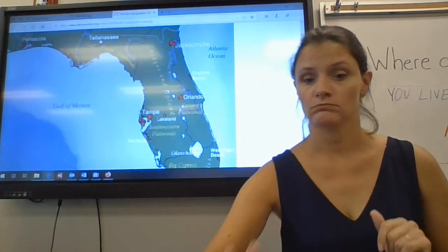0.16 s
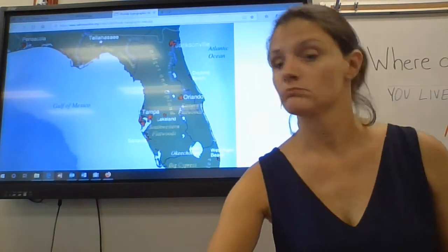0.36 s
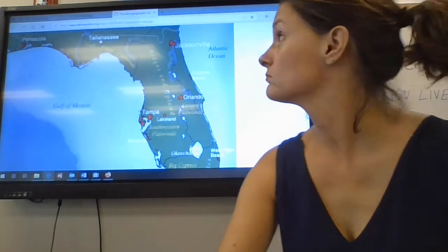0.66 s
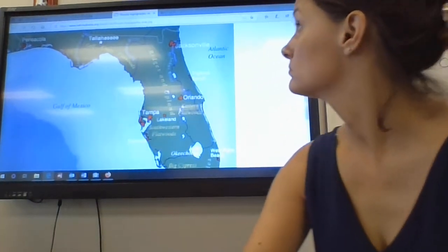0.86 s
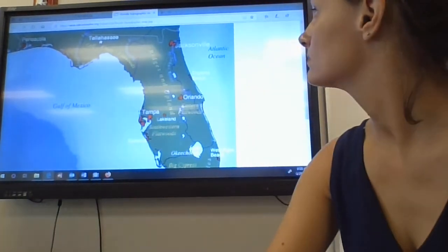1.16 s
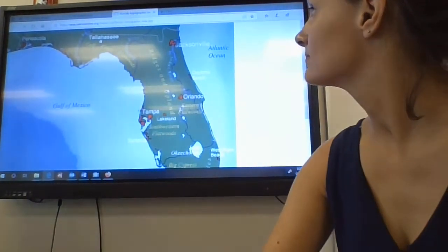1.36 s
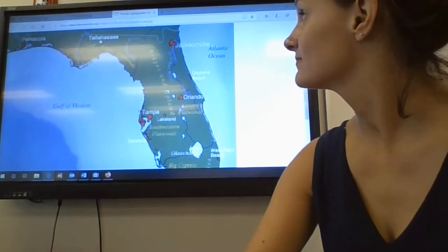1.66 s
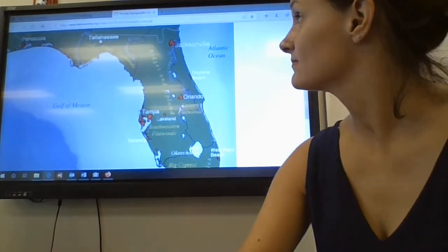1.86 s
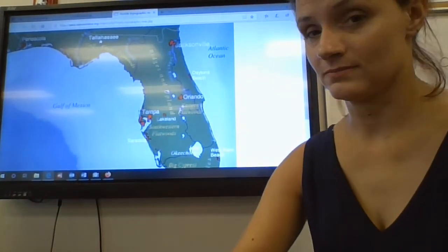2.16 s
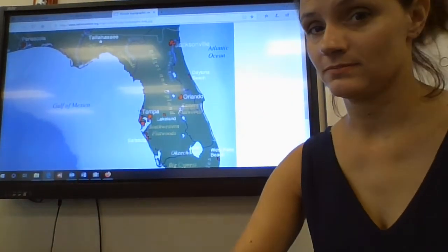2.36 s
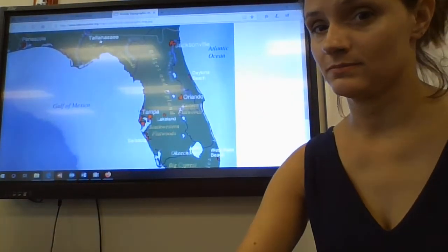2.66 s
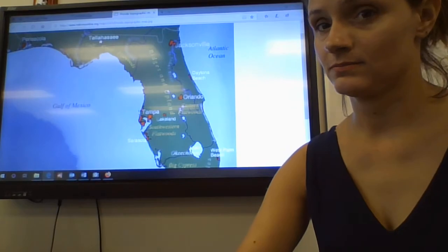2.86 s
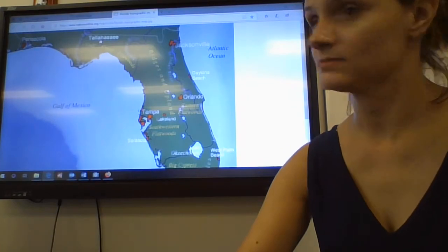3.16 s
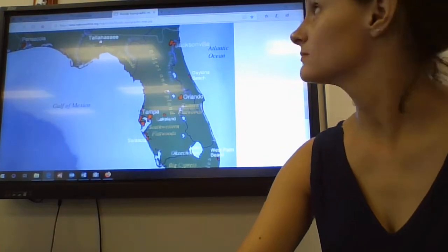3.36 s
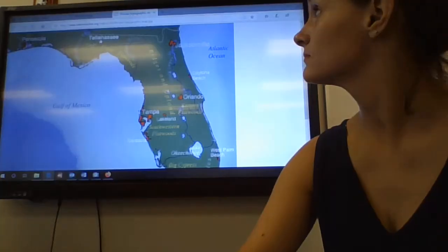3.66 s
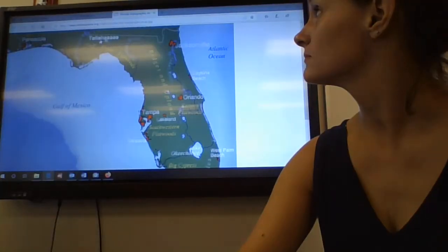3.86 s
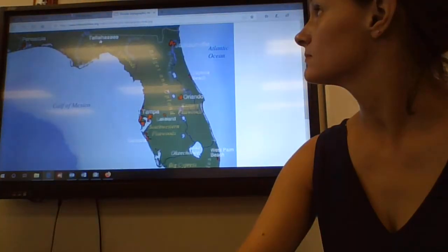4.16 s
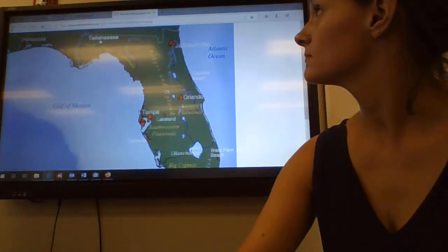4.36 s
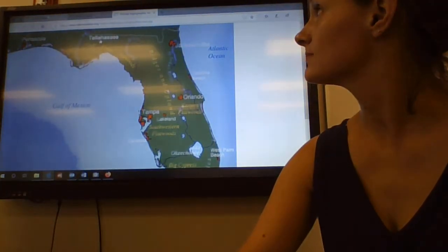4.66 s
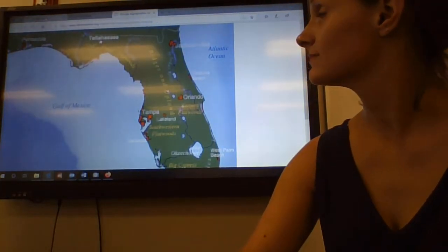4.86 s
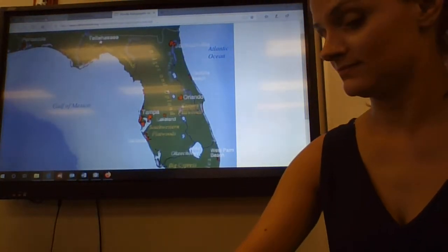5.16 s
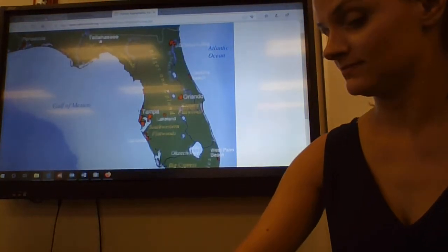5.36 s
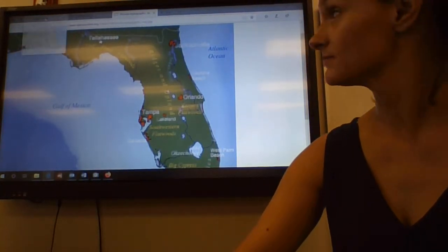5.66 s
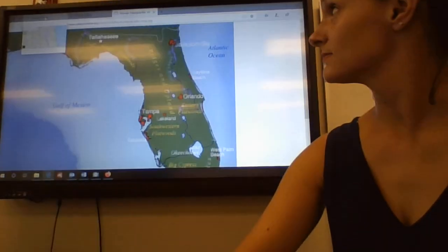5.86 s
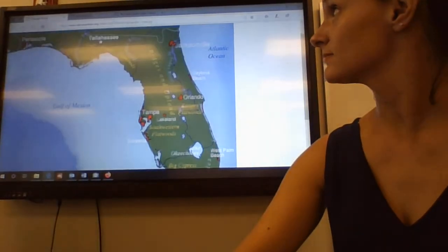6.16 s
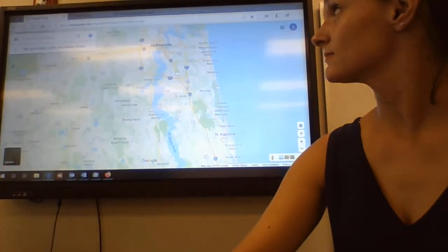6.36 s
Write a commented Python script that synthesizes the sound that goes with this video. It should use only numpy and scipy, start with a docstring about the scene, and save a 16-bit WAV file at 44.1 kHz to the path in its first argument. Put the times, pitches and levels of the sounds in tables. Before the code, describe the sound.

A steady, low electrical-sounding fan drone with soft air and hiss, picked up by a microphone built into the computer. Over it, fingertips thump the plastic case and desk at uneven intervals, some barely audible, with short grainy slides and faint cloth movement in the first seconds. Late on, a dry tick precedes a sharp, loud click-thud and a second as the button is let go. Little room echo.

```python
"""A laptop hums in a quiet classroom, heard by its own microphone: fan tones over rushing air, hiss, buzz and whine.
Fingers soon tap the case, ringing it and the desk; two short grainy slides scrape it, and clothing rustles softly.
Late on there is one electrical tick, then a button is clicked down and let go, each time a snap, a click and a thud.
Sharp sounds briefly open a noise suppressor, so the hum swells; the loud click makes a gain control turn it down."""
import sys
import numpy as np
from scipy import signal
from scipy.fft import rfft, irfft, next_fast_len
from scipy.io import wavfile
from scipy.ndimage import uniform_filter1d, map_coordinates

SR = 44100
rng = np.random.default_rng(int(sys.argv[2]) if len(sys.argv) > 2 else 0)


def digitize_waveform(pressure):
    """Quantize a signal to 16-bit integers and store it at the path in sys.argv[1].

    Rows of a 2-D input are taken as channels; values are limited to [-1, 1].
    """
    field = np.atleast_2d(pressure).T
    bounded = np.clip(field, -1, 1)
    quanta = np.round(bounded * 32767).astype(np.int16)
    wavfile.write(sys.argv[1], SR, quanta)


N = 287532
TIME = np.arange(N) / SR  # seconds
BLOW_SIZE = 2 ** 14  # samples kept for the ring of one knock
BLOW_FREQS = np.fft.rfftfreq(BLOW_SIZE, 1 / SR)  # Hz
CLICK_LEAD_S = 0.0012  # the hard click comes just before the thud


def amp(db):
    """Turn decibels into a gain."""
    return 10 ** (np.asarray(db) / 20)


def unit(x):
    """Scale x to an average strength (rms) of 1."""
    return x / np.sqrt(np.mean(x ** 2) + 1e-20)


def along(points, hz):
    """Read a curve of (Hz, value) points on a logarithmic frequency axis."""
    point_hz, values = np.transpose(points)
    return np.interp(np.log(hz + 1), np.log(point_hz + 1), values)


def wobble(rate):
    """A smooth random curve around zero, with `rate` random knots a second."""
    knots = rng.standard_normal(int(N * rate / SR) + 4)
    places = np.arange(len(knots) * 10) / 10
    smooth = map_coordinates(knots, [places], mode="nearest")
    return np.interp(TIME * rate, places, smooth)


def filtered(x, response):
    """Filter x by a response given as a function of frequency."""
    size = next_fast_len(N + SR // 2)  # spare room, so the end does not wrap round to the start
    freqs = np.fft.rfftfreq(size, 1 / SR)
    return irfft(rfft(x, size) * response(freqs), size)[:N]


def noise(spectrum):
    """Random noise coloured by a table of levels, at rms 1."""
    white = rng.standard_normal(N)
    return unit(filtered(white, lambda f: amp(along(spectrum, f))))


def resonance(f, hz, width):
    """Response of one ringing mode: strongest at hz, and the narrower it is the longer it rings."""
    return 1j * f * width / (hz * hz - f * f + 1j * f * width)


def body(modes, f):
    """Response of an object that rings at many modes, added with alternating signs."""
    total = 0
    for k, (hz, width, db) in enumerate(modes):
        total = total + (-1) ** k * amp(db) * resonance(f, hz, width)
    return total


def fan(tone_db=-52, air_db=-64.0, waver_db=0.0, overtone_waver_db=1):
    """The turning fan sounds at multiples of its shaft rate, the fourth far the strongest, over rushing air."""
    # fan tones: multiple of the shaft rate, level_db [dB, relative]
    fan_orders = [(1, -20.5), (2, -27.5), (3, -32), (4, 5.5), (5, -47.5), (6, -9.5), (7, -15.5), (8, -8),
                  (9, -18.5), (10, -39), (11, -22.5), (12, -16), (13, -15.5), (14, -30), (15, -23.5),
                  (16, -35.5), (17, -33)]
    # colour of the air in the vents: pitch_hz [Hz], level_db [dB per Hz, relative]
    air_colour = [(20, -11.5), (50, -4), (75, -5), (140, -3), (300, -1), (430, 1.5), (620, -7.5),
                  (800, -10), (1060, -11), (1350, -14), (1900, -17), (2300, -17), (3000, -29), (6000, -40)]
    shaft_hz, drift = 70.39, 0.00052  # turns per second, and the relative size of their slow drift
    turn = 2 * np.pi * np.cumsum(shaft_hz * (1 + drift * wobble(0.69))) / SR
    strongest = max(db for order, db in fan_orders)
    tones = np.zeros(N)
    for order, db in fan_orders:
        depth_db = waver_db if db == strongest else overtone_waver_db
        loudness = amp(db + depth_db * wobble(6.9))
        tones += loudness * np.sin(order * turn + rng.uniform(0, 2 * np.pi))
    return amp(tone_db) * unit(tones) + amp(air_db) * noise(air_colour)


def electronics(hiss_db=-78, buzz_db=-84, whine_db=-85, spurt_share=0.24, whine_hz=14446):
    """Hiss, a thin whine, and a buzz of tiny noise spurts that pass only when two clocks coincide."""
    # colour of the microphone hiss: pitch_hz [Hz], level_db [dB per Hz, relative]
    hiss_colour = [(1000, -4), (4000, -3), (6000, -11.5), (7300, -5), (9300, -8), (12500, -1.5),
                   (15500, -4)]
    # colour of the electrical buzz: pitch_hz [Hz], level_db [dB per Hz, relative]
    buzz_colour = [(1500, -32), (3500, 5), (5800, 0.5), (7500, 6.5), (8600, -7.5), (15000, -6)]
    fast, slow = TIME * 185.6 % 1, TIME * 83.3 % 1  # position within each clock's cycle, 0 to 1
    spurts = (fast < spurt_share) * (slow < 0.5)
    buzz = amp(buzz_db) * unit(spurts * noise(buzz_colour))
    whine = amp(whine_db) * unit(np.sin(2 * np.pi * whine_hz * TIME))
    return amp(hiss_db) * noise(hiss_colour) + buzz + whine


def push(hz, spread=0.5):
    """Force spectrum of a soft contact, centred on hz."""
    return resonance(BLOW_FREQS, hz, spread * hz) ** 2


def tick(hz, damping=0.95):
    """Force spectrum of a hard contact: roughly flat up to hz, with little bass."""
    u = 1j * BLOW_FREQS / hz
    return u / (u + 1 / 4) / (1 + damping * u + u ** 2)


def thud(hz, edge_db, edge_ratio=2.58, skin_ratio=11):
    """A soft push with a higher, harder edge; flesh rounds off its start."""
    blow = push(hz) + amp(edge_db) * tick(edge_ratio * hz)
    return blow / (1 + 1j * BLOW_FREQS / (skin_ratio * hz))


def crunch(t60, low_hz=1600, top_hz=4500):
    """Force spectrum of a brief burst of plastic grit: noise that falls 60 dB in t60 seconds."""
    f = BLOW_FREQS
    grit = rng.standard_normal(BLOW_SIZE) * amp(-60 * TIME[:BLOW_SIZE] / t60)
    low_cut = (1j * f / (1j * f + low_hz)) ** 2
    return rfft(grit / np.linalg.norm(grit)) * low_cut / (1 + 1j * f / top_hz)


def case_path(lag_at_100_hz=0.0018, notch_hz=6100, notch_width=1800):
    """From finger to microphone through case and desk; bending waves carry bass slowest, so it arrives last."""
    # ringing modes of the case: pitch_hz [Hz], width_hz [Hz], level_db [dB, relative]
    case_modes = [(110, 150, 1), (184, 76.2, 8), (253, 29.4, 7), (347, 83, 2.5), (570, 46, 2.5),
                  (702, 65, -1.5), (925, 49, -14), (1000, 64, -9), (1150, 71, -6.5), (1252, 230, -16),
                  (1735, 100, -19.5), (1790, 94, -23.5), (2250, 70, -29), (2530, 170, -29),
                  (3700, 810, -31.5), (4120, 150, -39), (7200, 396, -39.5), (8880, 500, -49),
                  (12000, 900, -54)]
    # ringing modes of the desk under it: pitch_hz [Hz], width_hz [Hz], level_db [dB, relative]
    desk_modes = [(85, 9.9, 2), (128, 21, 4)]
    f = BLOW_FREQS
    # the delay is lag_at_100_hz seconds at 100 Hz and shrinks with the square root of frequency
    travel = np.exp(-4j * np.pi * lag_at_100_hz * np.sqrt(f * 100))
    notch = 1 - resonance(f, notch_hz, notch_width)
    return (body(case_modes, f) + body(desk_modes, f)) * travel * notch


def add(out, s, peak_db, spectrum):
    """Mix the sound with this spectrum into out at s seconds, scaled to the given peak."""
    lead = BLOW_SIZE // 4  # space for whatever lies before the blow
    ring = np.roll(irfft(spectrum), lead)
    place = out[round(s * SR) - lead:][:BLOW_SIZE]  # a view, so out itself changes
    place += amp(peak_db) * ring[:len(place)] / np.abs(ring).max()


def taps(nail_crunch_db=-10):
    """Soft fingertip thuds ring the case; the touching fingernail adds a small gritty click."""
    # finger taps: start_s [s, at the thud], thud_peak_db [dB], thud_hz [Hz, centre of the push],
    # edge_db [dB, hard edge over the push], nail_peak_db [dB], nail_hz [Hz, centre of the click]
    tap_list = [ (0.1561, -71, 145, -13, -34.5, 1300), (0.162, -74, 140, -29, -50.5, 2290),
                (0.598, -23.5, 108, -17.5, -53, 1200), (0.765, -29.5, 147, -2.5, -68, 1000),
                (1.246, -48.5, 132, -15, -70, 1000), (2.3215, -23.5, 86, 8, -34.5, 600),
                (2.6262, -46.5, 135, -5, -65, 1000), (2.898, -50, 111, 7, -68, 1000),
                (3.3237, -18.5, 82, 17, -37, 1140), (3.8275, -35, 139, -25, -65, 1000),
                (4.574, -43.5, 128, -33, -74, 1000), (5.351, -43.5, 73, -5, -41, 1180),
                (5.6851, -29, 85, 9.5, -43.5, 900), ]
    out, path = np.zeros(N), case_path()
    for s, thud_db, hz, edge_db, nail_db, nail_hz in tap_list:
        add(out, s, thud_db, path * thud(hz, edge_db, skin_ratio=4))
        grit = amp(nail_crunch_db) * crunch(t60=0.15, top_hz=3 * nail_hz)
        nail = push(nail_hz, spread=0.73) + grit
        add(out, s - CLICK_LEAD_S, nail_db, path * nail)
    return out


def scrape(grain_db=4, attack_s=0.0065, release_t60=0.067):
    """Short grainy slides over the case ring well separated resonances: quick attack, hold, release."""
    # resonances of the scrape: pitch_hz [Hz], width_hz [Hz], level_db [dB, relative]
    scrape_modes = [(1080, 220, -1.5), (1300, 53, 4), (1800, 63, -6), (2040, 82, -10), (2540, 190, -6.5),
                    (3740, 130, -16), (4250, 260, -15), (7540, 1800, -28.5), (12000, 5300, -31.5)]
    # slides: start_s [s, when the attack is complete], length_s [s, until the release],
    # level_db [dB, rms while held], friction_hz [Hz, centre], friction_width_hz [Hz]
    slides = [(0.602, 0.11, -72, 2450, 1400), (0.952, 0.045, -55, 1800, 10000)]

    def colour(f):
        return sum(amp(db) * resonance(f, hz, width) ** 2 for hz, width, db in scrape_modes)

    out = np.zeros(N)
    for s, length, db, hz, width in slides:
        friction = rng.standard_normal(N) * amp(grain_db * wobble(300))
        ringing = unit(filtered(friction, lambda f: colour(f) * resonance(f, hz, width)))
        attack = np.clip((TIME - s) / attack_s + 1, 0, 1)
        release = amp(-60 * np.maximum(TIME - s - length, 0) / release_t60)
        out += amp(db) * attack * release * ringing
    return out


def rustle(flutter_db=2):
    """Arm and clothing shift softly as fluttering noise that swells and fades, the light moves without bass."""
    # colour of the rustle: pitch_hz [Hz], level_db [dB per Hz, relative]
    rustle_colour = [(40, -4), (130, 10.5), (550, 7), (820, -4), (1100, 6), (1500, -25), (2600, -27),
                     (5000, -41.5), (12000, -51)]
    # small movements: peak_s [s, when loudest], rise_s [s], fall_s [s], level_db [dB, rms when loudest],
    # low_cut_hz [Hz, bass below this is weakened]
    shifts = [(1.0, 0.13, 0.31, -58, 50), (1.76, 0.031, 0.067, -65, 905), (2.85, 0.079, 0.046, -65, 900),
              (3.68, 0.08, 0.1, -71, 900)]
    cloth = amp(flutter_db * wobble(29.66)) * noise(rustle_colour)
    out = np.zeros(N)
    for s, rise_s, fall_s, db, cut_hz in shifts:
        swell = np.exp(-((TIME - s) / np.where(TIME < s, rise_s, fall_s)) ** 2)
        out += amp(db) * swell * unit(filtered(cloth, lambda f: f ** 4 / (f ** 4 + cut_hz ** 4)))
    return out


def static_tick(s=5.248, spike_db=-33, fizz_db=-60, fizz_t60=0.067):
    """One sharp electrical tick, a single-sample spike, with a short dying fizz of noise behind it."""
    age = TIME - s
    sound = (age > 0) * amp(fizz_db - 60 * np.abs(age) / fizz_t60) * rng.standard_normal(N)
    sound[round(s * SR)] += amp(spike_db)
    return sound


def button(snap_grit_db=-2, edge_db=-0.5, click_grit_db=-11):
    """On each stroke the spring snaps over, then the button hits its hard stop with a gritty click and a thud."""
    # strokes, down then up: start_s [s, at the stop], thud_peak_db [dB], thud_hz [Hz, centre],
    # click_peak_db [dB], click_hz [Hz, centre], snap_peak_db [dB], snap_hz [Hz, brightness],
    # travel_s [s, from snap to stop]
    strokes = [(5.8311, -1.5, 397, -19, 1690, -25, 7000, 0.0089),
               (5.9128, -3.5, 197, -39, 1300, -31.5, 1000, 0.0045)]
    out, path = np.zeros(N), case_path()
    for s, thud_db, hz, click_db, click_hz, snap_db, snap_hz, travel_s in strokes:
        snap = tick(snap_hz) + amp(snap_grit_db) * crunch(t60=0.02, top_hz=snap_hz)
        add(out, s - travel_s, snap_db, path * snap)
        click_grit = amp(click_grit_db) * crunch(t60=0.019, top_hz=2 * click_hz)
        click = push(click_hz, spread=0.38) + click_grit
        add(out, s - CLICK_LEAD_S, click_db, path * click)
        add(out, s, thud_db, path * thud(hz, edge_db))
    return out


def room(x):
    """The classroom's echo tail: random reflections in which each frequency dies at its own speed."""
    # echo decay: pitch_hz [Hz], t60_s [s to fall by 60 dB]
    decay = [(100, 0.26), (1000, 0.12), (4000, 0.44), (12000, 0.49)]
    hz, t, grid = signal.stft(rng.standard_normal(SR // 2), SR, nperseg=256)
    fading = amp(-60 * t / along(decay, hz)[:, None])
    tail = signal.istft(grid * fading, SR, nperseg=256)[1]
    delayed = np.pad(tail, (SR // 100, 0))  # the echo starts 10 ms late
    return signal.fftconvolve(x, delayed / np.linalg.norm(tail))[:N]


def scene(knock_room_db=-30, scrape_room_db=-10):
    """Knocks travel through the case and stay nearly dry; the scrape also fills the room."""
    hum = fan() + electronics()
    hits = taps() + button()
    slide = scrape()
    echo = room(amp(knock_room_db) * hits + amp(scrape_room_db) * slide)
    return hum + hits + slide + rustle() + static_tick() + echo


def suppressor(x, trigger_db=-62, opening_db=4, closing_s=0.1):
    """A mild noise suppressor: strong treble opens it, and everything is louder for a moment."""
    treble = filtered(x, lambda f: (f / (f + 1000)) ** 3)
    power = uniform_filter1d(treble ** 2, size=SR // 500)  # averaged over 2 ms
    sudden = power > amp(trigger_db) ** 2
    last_trigger = np.maximum.accumulate(np.where(sudden, TIME, -1))
    opening = np.exp(-(TIME - last_trigger) / closing_s)
    return x * amp(opening_db * uniform_filter1d(opening, size=SR // 200))


def record(dry, low_hz=35, threshold=0.61, release_s=5, ratio=0.35, top_hz=15900):
    """Bass roll-off, suppressor, gain control with a slow release, soft overload and a steep treble limit."""
    x = suppressor(filtered(dry, lambda f: 1j * f / (1j * f + low_hz)))
    # the held peak jumps up at once and leaks away slowly
    fade = np.exp(-TIME / release_s)
    held_peak = fade * np.maximum.accumulate(np.abs(x) / fade)
    gain = np.maximum(held_peak / threshold, 1) ** -ratio
    x = x * uniform_filter1d(gain, size=SR // 100)
    x = x / (1 + (x / 1.2) ** 6) ** (1 / 6)  # soft overload: peaks bend towards 1.2
    return filtered(x, lambda f: 1 / np.sqrt(1 + (f / top_hz) ** 120))


dry = scene()
out = record(dry)
digitize_waveform(out)
```